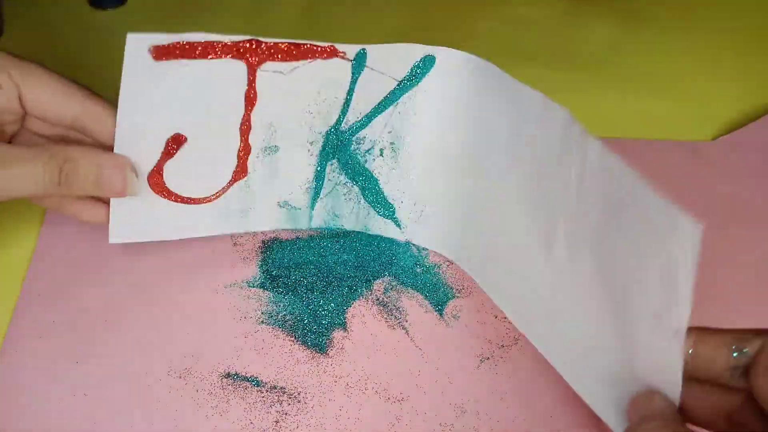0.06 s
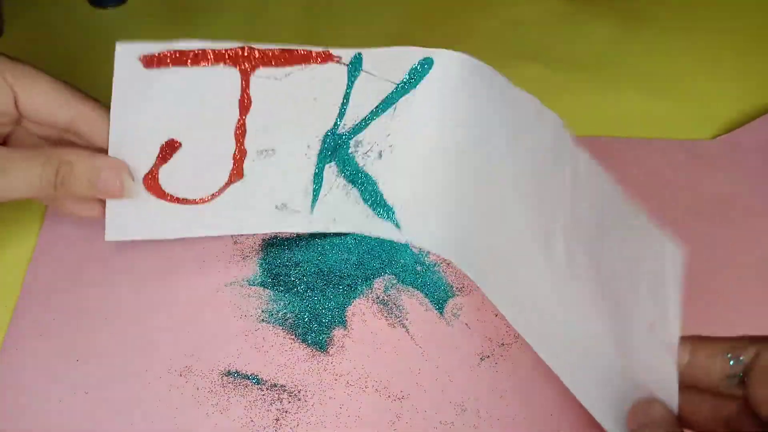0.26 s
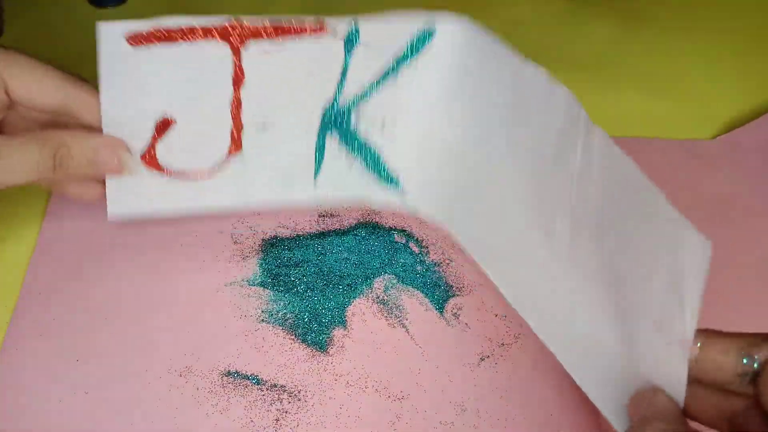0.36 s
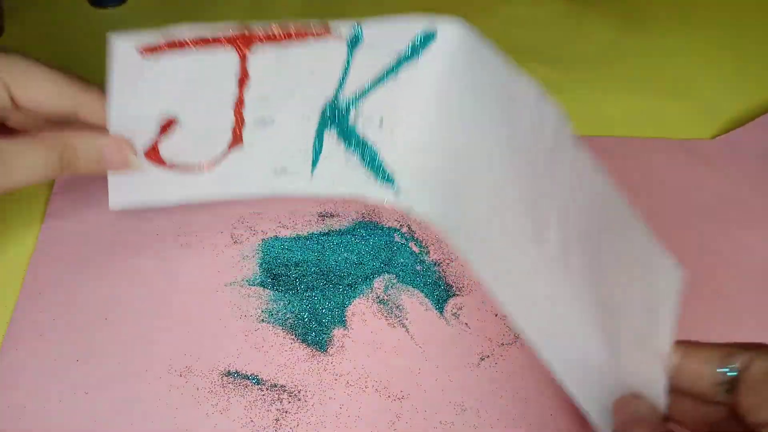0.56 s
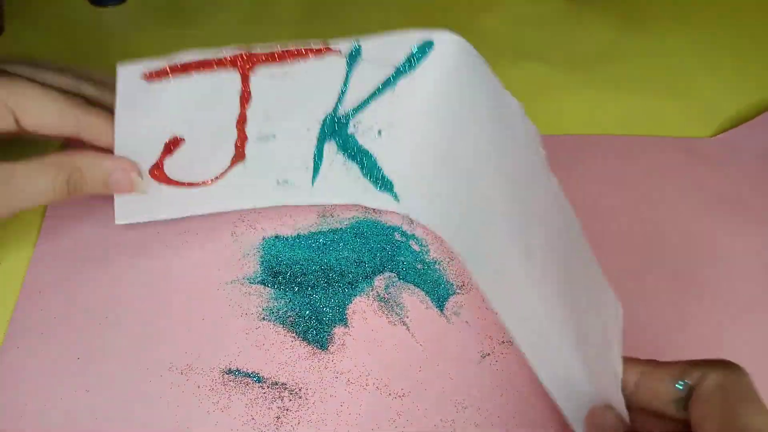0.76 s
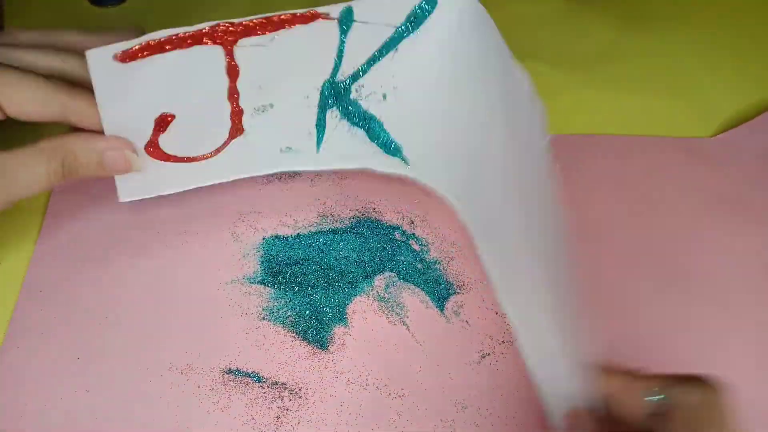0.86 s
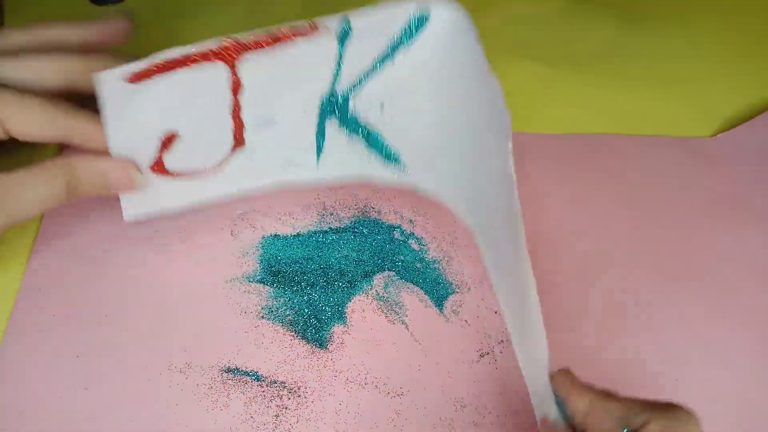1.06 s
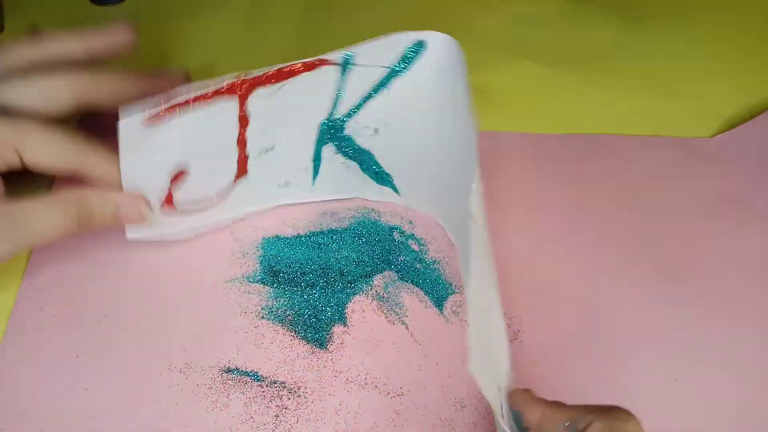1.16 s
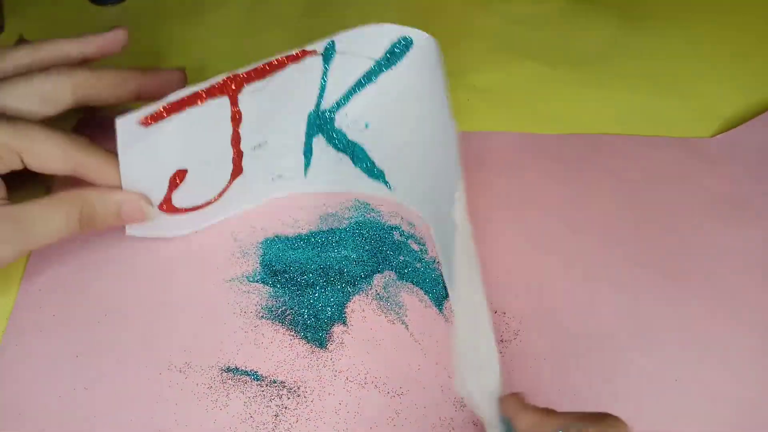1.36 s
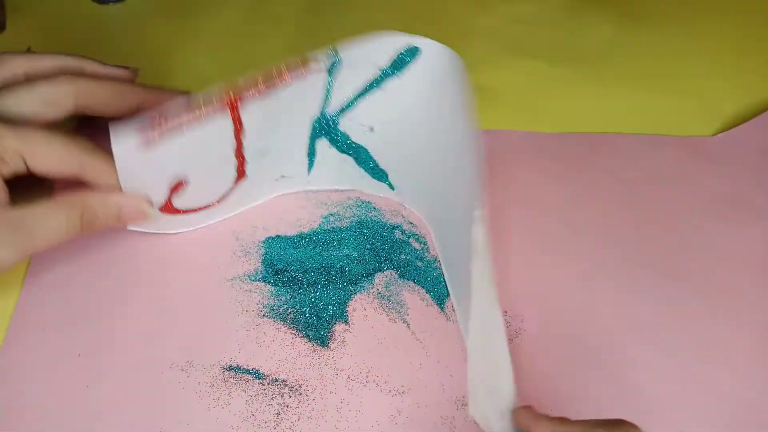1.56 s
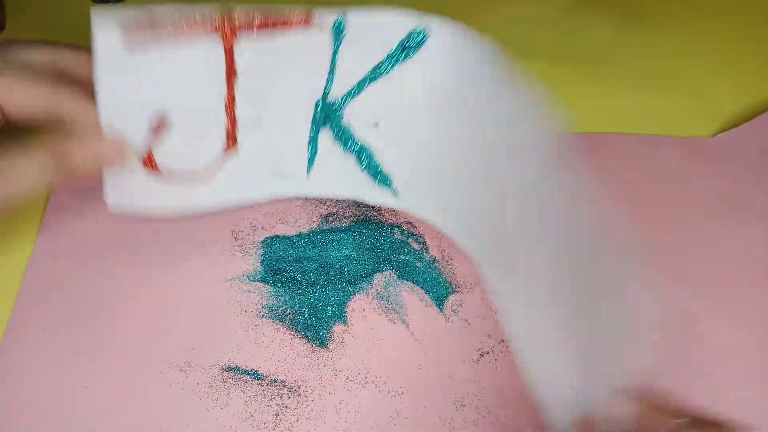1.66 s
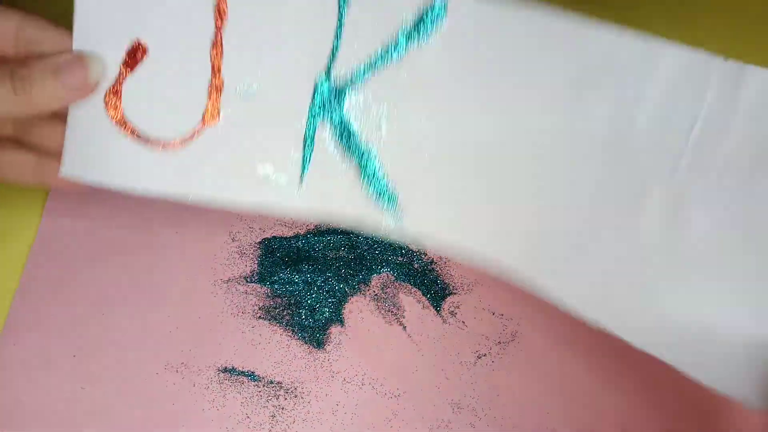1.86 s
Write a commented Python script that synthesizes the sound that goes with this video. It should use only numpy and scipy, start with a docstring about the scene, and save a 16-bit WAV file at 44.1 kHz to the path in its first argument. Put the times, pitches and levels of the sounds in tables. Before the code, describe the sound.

A finger taps a sheet of paper, shaking off loose glitter that patters down.

```python
"""A small quiet room with a faint mains hum, the microphone close to a sheet of paper.
A finger taps the sheet about four times a second to shake loose glitter off it. Each tap snaps
against the paper and thumps its low modes; the glitter hops, patters down again and slides away.
Towards the end the bent sheet rustles and buckles with a few pops."""
import sys
import numpy as np
from scipy import signal
from scipy.fft import rfft, irfft, next_fast_len
from scipy.io import wavfile

SR = 44100
rng = np.random.default_rng(int(sys.argv[2]) if len(sys.argv) > 2 else 0)


def digitize_waveform(pressure):
    """Quantize a signal to 16-bit integers and store it at the path in sys.argv[1].

    Rows of a 2-D input are taken as channels; values are limited to [-1, 1].
    """
    field = np.atleast_2d(pressure).T
    bounded = np.clip(field, -1, 1)
    quanta = np.round(bounded * 32767).astype(np.int16)
    wavfile.write(sys.argv[1], SR, quanta)


N = 83790

# Finger taps. Each row: start in seconds, bright snap in dB, flutter in dB, crack in dB,
# crack centre in Hz, dull knock in dB, low thump in dB.
TAPS = [(-0.004, -47.5, -56.5, -60, 3000, -74, -42), (0.1987, -34, -45.5, -41, 1380, -41, -44.5),
        (0.4393, -35, -39.5, -34.5, 2900, -48.5, -47.5), (0.6626, -36, -41, -24.5, 3170, -38.5, -38.5),
        (0.8902, -35, -41.5, -55, 1660, -41.5, -41), (1.1100, -59, -45.5, -40, 2920, -33, -31.5),
        (1.3005, -39.5, -39.5, -39, 1840, -32.5, -28.5)]
POP_RISE_S = 0.00037


def undb(db):
    """Decibels to gain."""
    return 10 ** (np.asarray(db) / 20)


def clock():
    """Time of every sample in seconds."""
    return np.arange(N) / SR


def noise():
    """White noise of unit power."""
    return rng.standard_normal(N)


def curve(points):
    """Gain that follows points of seconds and dB."""
    return undb(np.interp(clock(), *np.array(points).T))


def burst(start, rise, hold, fall):
    """Envelope with a smooth attack, a hold and an exponential release, all in seconds."""
    age = clock() - start
    attack = np.sin(np.pi / 2 * np.clip(age / rise, 0, 1)) ** 2
    return attack * np.exp(-np.maximum(age - rise - hold, 0) / fall)


def shape(x, response):
    """Causal filter of unit mean power, from a function that gives the gain at each frequency."""
    size = next_fast_len(2 * N)
    gain = response(np.maximum(np.fft.rfftfreq(size, 1 / SR), 1))
    cepstrum = irfft(np.log(gain / np.sqrt(np.mean(gain ** 2))), size)
    cepstrum[1:size // 2] *= 2  # fold to minimum phase
    cepstrum[size // 2 + 1:] = 0
    return irfft(rfft(x, size) * np.exp(rfft(cepstrum)), size)[:N]


def colour(x, points):
    """Gives x a spectrum drawn through points of Hz and relative dB."""
    hz, db = np.array(points).T
    return shape(x, lambda f: undb(np.interp(np.log(f), np.log(hz), db)))


def resonate(envelope, hz, width_hz, skirt_hz, hiss_db=-57):
    """A crackle rings one broad resonance over a faint hiss; its energy is that of the envelope."""
    band = lambda f: (1 + ((f - hz ** 2 / f) / width_hz) ** 2) ** -.65
    soft_top = lambda f: (1 + (f / (hz + width_hz / 2 + skirt_hz)) ** 10) ** -.5
    crackle = shape(envelope * noise(), lambda f: band(f) * soft_top(f) + undb(hiss_db))
    return crackle * np.sqrt(np.sum(envelope ** 2) / np.sum(crackle ** 2))


def grains(per_s=9000, spread_db=2.8):
    """Dense tiny impacts of uneven size, at unit power."""
    hits = (rng.random(N) < per_s / SR) * np.sign(noise())
    impacts = hits * undb(spread_db * np.minimum(rng.exponential(size=N), 4))
    return impacts / impacts.std()


def room_tone(air_db=-63.5, hum_db=-66.5, hum_hz=100):
    """The quiet room: low, steady noise and a faint mains hum."""
    # Room noise. Each row: frequency in Hz, relative level in dB.
    air_spectrum = [(25, -17.5), (60, 1), (125, 7), (250, -7.5), (600, -17), (2000, -18), (4500, -25.5),
                    (8000, -74), (11000, -38), (15400, -27), (16200, -83)]
    hum = undb(hum_db) * np.sqrt(2) * np.sin(2 * np.pi * hum_hz * clock())
    return undb(air_db) * colour(noise(), air_spectrum) + hum


def room(x, wet_db=-22.5, t60_s=0.24, gap_s=0.01):
    """Adds short diffuse reflections from table and walls, well below the close sound."""
    # Tone of the reflections. Each row: frequency in Hz, relative level in dB.
    tail_spectrum = [(100, 8.5), (500, 10.5), (2500, 5), (8000, -11.5), (16000, -8.5)]
    decay = burst(gap_s, rise=0.00079, hold=0, fall=t60_s / np.log(1000))
    tail = colour(noise() * decay, tail_spectrum)
    return x + undb(wet_db) * signal.fftconvolve(x, tail / np.sqrt(np.sum(tail ** 2)))[:N]


def sheet(x):
    """The paper rings with all that touches it; bending stiffens it and favours a higher treble peak."""
    # Resonances of the sheet. Each row: centre in Hz, width in Hz, lift in dB.
    resonances = [(448, 60, 6), (950, 100, 8), (1505, 80, 5), (1835, 90, 6), (1985, 80, 5),
                  (2980, 300, 4.5), (4380, 160, 4), (5210, 260, 3.5), (11600, 300, 3)]
    flat_peak, bent_peak = (7950, 450, 3), (8650, 600, 4)  # same columns
    # How far the sheet is bent. Each row: time in seconds, bend from 0 (flat) to 1.
    bend_points = [(.7, 0), (1.1, 0.9), (1.6, 0.8)]

    def ring(peak):
        lift_db = lambda f: sum(db / (1 + (2 * (f - hz) / width_hz) ** 2)
                                for hz, width_hz, db in resonances + [peak])
        return shape(x, lambda f: undb(lift_db(f)))

    bend = np.interp(clock(), *np.array(bend_points).T)
    return (1 - bend) * ring(flat_peak) + bend * ring(bent_peak)


def edge_ticks():
    """The edge of the paper flicks against the fingers with small dry ticks."""
    # Flicks of the edge. Each row: start in seconds, level in dB.
    flicks = [(1.1696, -46.5), (1.1942, -40.5), (1.4397, -52.5), (1.492, -42)]
    # Tone of a tick. Each row: frequency in Hz, relative level in dB.
    tick_spectrum = [(300, -11), (1200, 10), (2600, 4), (4200, -8), (5400, 4.5), (6800, -4), (8500, 3.5),
                     (11000, -23)]
    envelope = sum(undb(db) * burst(at, POP_RISE_S, hold=0, fall=0.0046) for at, db in flicks)
    return colour(envelope * noise(), tick_spectrum)


def buckling():
    """The sheet rustles as it flexes and pops as it springs back or buckles, each pop at its own pitch."""
    # Pops. Each row: start in seconds, level in dB, centre in Hz, width in Hz, decay in seconds.
    pop_events = [(0.47, -39.5, 2930, 350, 0.0028), (0.515, -51, 282, 111, 0.0042),
                  (0.699, -40.5, 2960, 450, 0.0078), (1.304, -35.5, 890, 219, 0.0087),
                  (1.3617, -38, 1920, 1340, 0.011), (1.367, -42.5, 3120, 450, 0.0052),
                  (1.4231, -39.5, 660, 455, 0.0055), (1.4385, -30.5, 1800, 810, 0.0063),
                  (1.439, -41.5, 586, 495, 0.0037), (1.496, -48, 555, 727, 0.022),
                  (1.503, -44, 139, 25, 0.012), (1.5618, -32, 1140, 1000, 0.0048),
                  (1.5659, -25.5, 3100, 548, 0.0031), (1.565, -41, 211, 70, 0.0067),
                  (1.57, -31, 2150, 1300, 0.0088), (1.617, -41.5, 830, 260, 0.0055)]
    # Swell of the dull rustle. Each row: time in seconds, level in dB.
    rustle_levels = [(0, -80), (1.25, -75), (1.38, -62.5), (1.52, -51), (1.62, -57.5), (1.74, -60.5),
                     (1.82, -62.5), (1.9, -60)]
    # Tone of the rustle. Each row: frequency in Hz, relative level in dB.
    rustle_spectrum = [(80, -10), (170, 5), (320, -2.5), (900, -10), (2200, -0.5), (4000, -29.5),
                       (9000, -112)]
    pops = sum(resonate(undb(db) * burst(at, POP_RISE_S, 0, fall), hz, width_hz, skirt_hz=452)
               for at, db, hz, width_hz, fall in pop_events)
    return pops + colour(curve(rustle_levels) * grains(), rustle_spectrum)


def glitter(trickle_per_s=32, trickle_db=2.2):
    """Grains thrown up by the taps land in showers, then trickle unevenly down the slope."""
    # Showers landing. Each row: peak time in seconds, level in dB, rise and fall in seconds.
    showers = [(0.052, -45.5, 0.0093, 0.0094), (0.063, -53, 0.021, 0.003), (0.245, -39.5, 0.015, .011),
               (0.462, -44, 0.0072, 0.013), (0.475, -43.5, 0.014, 0.0038), (0.679, -43, 0.0047, 0.013),
               (0.702, -47.5, 0.0052, 0.0044), (0.712, -45.5, 0.0088, 0.0077), (0.939, -37, 0.015, 0.017),
               (1.148, -41.5, 0.0059, 0.0062), (1.338, -42.5, 0.018, 0.009), (1.366, -42, 0.0041, 0.0094),
               (1.511, -42.5, 0.011, 0.012), (1.525, -42, 0.0059, 0.0059), (1.553, -47, 0.012, .005),
               (1.57, -36, 0.011, 0.0078)]
    # Glitter sliding over the paper. Each row: time in seconds, level in dB.
    slide_levels = [(0, -60), (0.11, -66.5), (0.18, -73.5), (0.36, -70.5), (0.4, -66), (0.425, -77),
                    (0.54, -69.5), (0.58, -66.5), (0.64, -69.5), (0.75, -61), (0.83, -63), (0.88, -61.5),
                    (1.02, -60.5), (1.09, -69), (1.2, -57), (1.28, -74.5), (1.467, -71), (1.475, -48),
                    (1.6, -58), (1.67, -56.5), (1.72, -61.5), (1.79, -61), (1.86, -54.5), (1.9, -53.5)]
    # Tone of the landing and of the sliding. Each row: frequency in Hz, relative level in dB.
    landing_spectrum = [(80, -22), (220, -6), (450, -3.5), (950, -3.5), (1300, -3.5), (1900, 4.5),
                        (2500, 1), (3050, 4), (4200, -8), (5500, -7.5), (6600, -8.5), (8200, 1.5),
                        (10200, -13.5), (13000, -22.5), (15400, -12.5), (16200, -43)]
    slide_spectrum = [(80, -3), (300, -1.5), (900, -1), (2000, 1), (3100, -2.5), (4300, -9.5), (6500, -6.5),
                      (8300, 0.5), (10200, -12), (13000, -19), (15400, -8.5), (16200, -64)]
    landing = sum(undb(db) * burst(at - rise, rise, 0, fall) for at, db, rise, fall in showers)
    trickle = undb(trickle_db * np.interp(clock() * trickle_per_s, np.arange(N), noise()))
    patter = colour(landing * grains(), landing_spectrum)
    slide = colour(curve(slide_levels) * trickle * grains(), slide_spectrum)
    return patter + slide


def thumps():
    """Each tap sets the whole sheet swinging in its low modes."""
    # Low modes of sheet and room. Each row: frequency in Hz, relative level in dB, decay in seconds.
    modes = [(141.2, -3.5, 0.0094), (132.24, -10, 0.054), (144.3, -19.5, 0.05), (186, -22, 0.054),
             (243.4, -22.5, 0.004)]
    swing = 0
    for at, *_, thump_db in TAPS:
        for hz, db, fall in modes:
            envelope = undb(thump_db + db) * burst(at, rise=0.01, hold=0.028, fall=fall)
            swing += envelope * np.sin(2 * np.pi * hz * (clock() - at))
    return swing


def finger_taps(snap_rise_s=0.0012, snap_hold_s=0.0034):
    """The finger snaps against the paper, which cracks, knocks and flutters briefly."""
    # Tone of the bright snap and of the dull knock. Each row: frequency in Hz, relative level in dB.
    snap_spectrum = [(100, -9.5), (200, -9), (450, -3), (700, -16), (1000, -13), (1300, -13.5), (1850, 1.5),
                     (2500, -5.5), (3200, -0.5), (4000, -10.5), (5200, -5.5), (6500, -11), (7800, 2),
                     (10000, -9.5), (13000, -19), (15400, -9.5), (16200, -32)]
    knock_spectrum = [(80, -24.5), (180, 8), (300, -3), (450, -1), (650, -3.5), (880, -0.5), (1200, -2),
                      (1900, 0.5), (3000, -6.5), (4200, -23), (9000, -12), (16000, -86)]
    snaps = cracks = knocks = 0
    for at, snap_db, flutter_db, crack_db, crack_hz, knock_db, _ in TAPS:
        contact = undb(snap_db) * burst(at, snap_rise_s, snap_hold_s, fall=0.00067)
        flutter = undb(flutter_db) * burst(at, snap_rise_s, snap_hold_s, fall=0.014)
        snaps += np.hypot(contact, flutter)  # the two add in power
        crack_envelope = undb(crack_db) * burst(at, rise=0.0024, hold=0, fall=0.00077)
        cracks += resonate(crack_envelope, crack_hz, width_hz=430, skirt_hz=950)
        knocks += undb(knock_db) * burst(at, rise=0.0045, hold=0, fall=0.014)
    return colour(snaps * noise(), snap_spectrum) + cracks + colour(knocks * noise(), knock_spectrum)


def scene():
    """Paper and glitter close to one microphone, the room faint behind them."""
    paper = sheet(finger_taps() + glitter() + edge_ticks() + buckling())
    return (room(paper) + thumps() + room_tone())[None]


def record(dry, low_cut_hz=63, top_hz=16700):
    """The microphone chain thins the deep bass and cuts the top steeply."""
    low_cut = signal.butter(2, low_cut_hz, "high", fs=SR, output="sos")
    top_cut = signal.ellip(10, .2, 70, top_hz, fs=SR, output="sos")
    return signal.sosfilt(top_cut, signal.sosfilt(low_cut, dry))


dry = scene()
out = record(dry)
digitize_waveform(out)
```